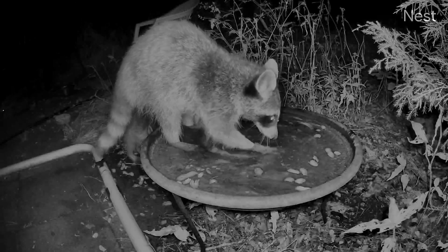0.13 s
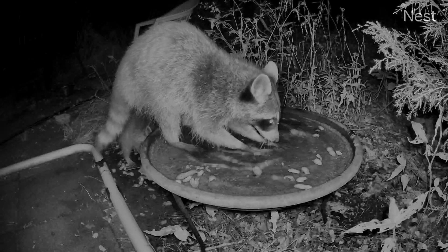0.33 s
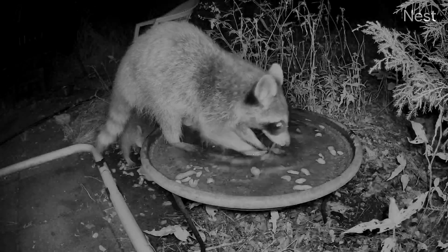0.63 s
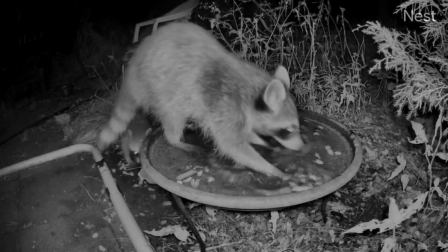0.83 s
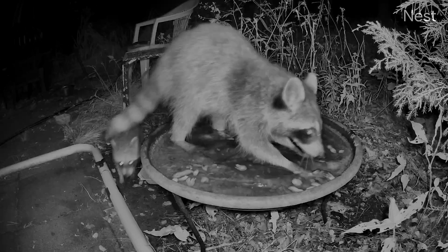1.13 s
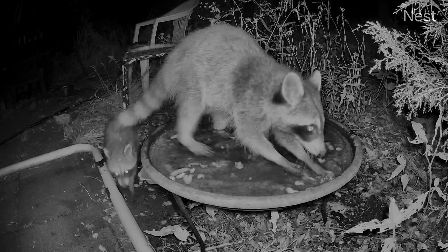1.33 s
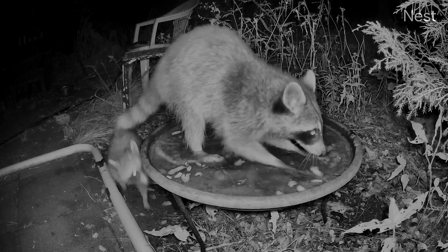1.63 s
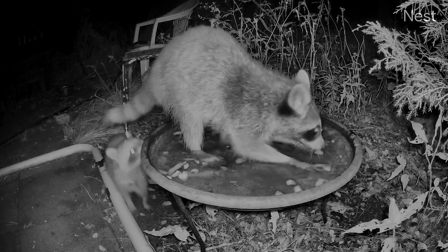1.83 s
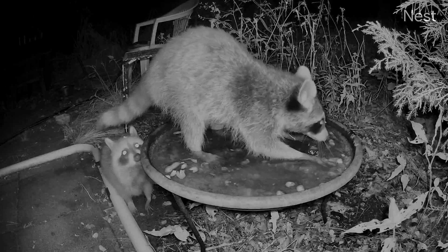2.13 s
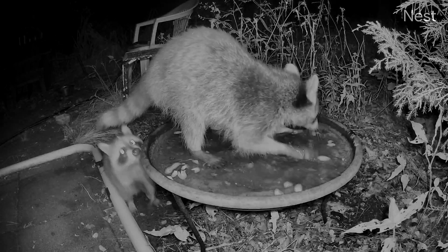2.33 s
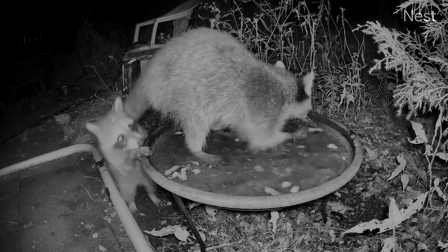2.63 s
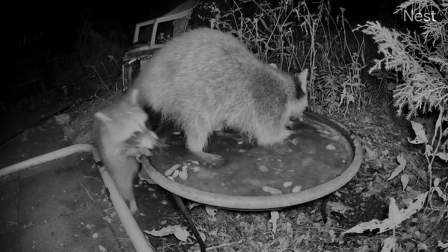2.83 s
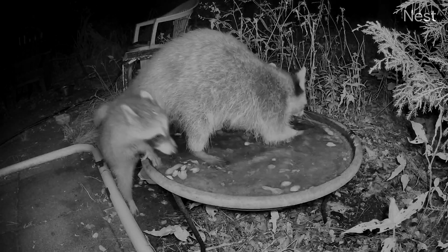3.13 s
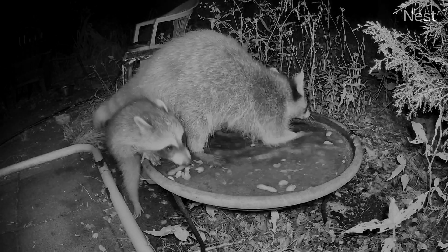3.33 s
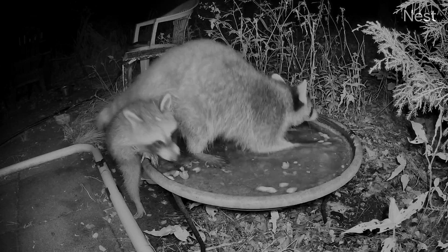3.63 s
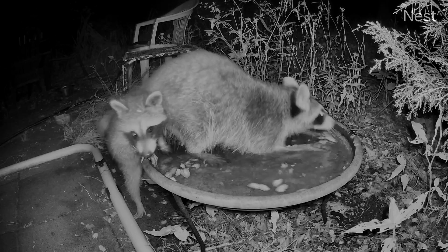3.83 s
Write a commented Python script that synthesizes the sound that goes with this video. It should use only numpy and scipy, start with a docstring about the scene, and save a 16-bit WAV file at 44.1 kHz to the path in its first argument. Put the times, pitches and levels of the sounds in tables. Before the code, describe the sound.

Raccoon chittering: fast throaty purring chirps in two bursts, with water drips and faint paw scuffs

```python
"""Night garden: crickets and katydids buzz as throbbing resonant noise over far traffic rumble, shaped noise.
A near katydid stops early; then an adult raccoon paws a shallow water dish: drips ring as bubbles, claws
tick as noise bursts and paws scuff as friction noise. A young raccoon chitters a long trill of short
voiced pulses and gliding notes; after more pawing comes a second, shorter trill.
A small outdoor camera microphone, dull above 7 kHz."""
import sys
import numpy as np
from scipy import signal
from scipy.fft import rfft, irfft
from scipy.io import wavfile
from scipy.ndimage import uniform_filter1d

SR = 44100
rng = np.random.default_rng(int(sys.argv[2]) if len(sys.argv) > 2 else 0)


def transcribe(u):
    """Save the signal u as a 16-bit wav file named by the first command-line argument.

    u: samples, shape (n,) or (channels, n), limited to [-1, 1]; the rate is SR.
    q: integer samples, one column per channel.
    """
    v = np.clip(np.atleast_2d(u).T, -1, 1)
    q = np.round(v * 32767).astype(np.int16)
    wavfile.write(sys.argv[1], SR, q)


def makeup_ratio(level_db):
    """Linear amplitude ratio for a level in decibels (20 dB per factor of ten)."""
    decades = np.asarray(level_db, float) / 20
    return 10 ** decades


N = 176400


def curve(s, v):
    """Linear interpolation: points joined in time."""
    return np.interp(np.arange(N) / SR, s, v)


def unit(x):
    """Normalization: scaled to rms 1."""
    return x / np.sqrt(np.mean(x ** 2) + 1e-20)


def bell(t, width):
    """Gaussian pulse of height 1, width being its standard deviation."""
    return np.exp(-.5 * (t / width) ** 2)


def drift(rate):
    """Lowpassed random fluctuation of spread 1; rate is the corner of each of two poles, in Hz."""
    r = np.exp(-2 * np.pi * rate / SR)
    return unit(signal.lfilter([1], [1, -2 * r, r * r], rng.standard_normal(N + SR))[SR:])


def pitch_wobble():
    """Frequency jitter: a cycle-to-cycle pitch factor around 1."""
    return 1 + .018 * drift(150)


def band_noise(order, low_hz, high_hz):
    """Bandpass-filtered white noise, rms 1."""
    band = signal.butter(order, [low_hz, high_hz], "band", fs=SR, output="sos")
    return unit(signal.sosfilt(band, rng.standard_normal(N)))


def resonate(x, hz, width):
    """Resonance: two passes through one two-pole filter, rms 1; width is that of one pass."""
    r = np.exp(-np.pi * width / SR)
    for _ in range(2):
        x = signal.lfilter([1, 0, -1], [1, -2 * r * np.cos(2 * np.pi * hz / SR), r * r], x)
    return unit(x)


def add(out, s, x):
    """Superposition: mixes x in at time s."""
    i = int(s * SR)
    out[i:i + len(x)] += x[:N - i]


# Voiced pulses of the trills: peak_s, peak_db (fundamental), rise_s, pitch_hz,
# partial_2_db, partial_3_db, partial_4_db, partial_5_db (relative to the fundamental)
TRILL_PULSES = [(1.7808, -49, 0.0068, 782, -25, -32, -16, -13.5),
                (1.989, -45.5, 0.0074, 901, -14, -20, -25, -27),
                (2.032, -39, 0.008, 1119, -2.5, -24.5, -29, -36),
                (2.0731, -32.5, 0.0076, 992, -13.5, -30.6, -28, -45),
                (2.1072, -32, 0.0061, 1032, -12.2, -33, -22, -27),
                (2.146, -32, 0.0133, 1095, -12.5, -22, -27.7, -34),
                (2.1885, -31, 0.0118, 1011, -16, -20.5, -25.5, -27),
                (2.229, -30.2, 0.0093, 1042, -15, -15, -25.9, -30),
                (2.2693, -30.5, 0.0086, 1059, -12.5, -12, -24.5, -32.4),
                (2.3138, -28.5, 0.0173, 951, -16, -29, -31.5, -44.5),
                (2.617, -28.5, 0.009, 930, -17.5, -36, -42.5, -37),
                (2.6532, -28, 0.0128, 1049, -12, -27.1, -23.5, -34.4),
                (2.687, -26.5, 0.0109, 1028, -13, -19, -23.5, -27.5),
                (3.7671, -40, 0.0054, 680, -38, -34, -22, -28),
                (3.8054, -34.5, 0.015, 785.3, -28, -31.9, -20.2, -25),
                (3.8381, -28.5, 0.0083, 937, -7.5, -32, -19.5, -25.5),
                (3.8742, -32, 0.0125, 1033, -2.5, -13.8, -9.5, -29),
                (3.9118, -30.5, 0.0082, 935, -6, -26, -11, -13.5),
                (3.9525, -31, 0.0126, 903, -7, -29, -10, -14),
                (3.9943, -34.5, 0.0091, 910, -1.5, -16.5, -8, -11)]


def trill_pulses():
    """Harmonic synthesis: a near sine swells upward in pitch; overtones and rasp flare at its close."""
    rise_steep, rise_shape, fall_s = 2.8, 2.47, .0046
    pitch_rise, pitch_drop = .09, .083  # share climbed in the rise, sagged in the fall
    flare_lag_s, flare_width_s, octave_width_s = .0017, .0023, .0026
    rasp_db, breath_db, breath_s = -10, -16, .024  # levels relative to the fourth partial
    spray_db = -34.5  # airy top, relative to the fundamental
    gulp_hz, gulp_db, gulp_spread_db, gulp_lag_s, gulp_s = 640, -25, 4, .004, .003
    out = np.zeros(N)
    hiss = band_noise(4, 1600, 5200)
    spray = band_noise(3, 5000, 9500)
    wobble = pitch_wobble()
    for s, db, rise, hz, octave_db, *upper in TRILL_PULSES:
        t = np.arange(-2 * rise, .04, 1 / SR)  # zero at the peak
        span = slice(int(s * SR) - len(t), int(s * SR))
        swell = np.exp(-rise_steep * np.abs(t / rise) ** rise_shape)
        release = np.exp(-np.abs(t / fall_s) ** 4)
        envelope = np.where(t < 0, swell, release)
        sag = -pitch_drop * np.minimum(t / fall_s, 2) ** 2
        bend = 1 + np.where(t < 0, pitch_rise * t / rise, sag)
        phase = 2 * np.pi * np.cumsum(hz * wobble[span] * bend) / SR

        octave = makeup_ratio(octave_db) * bell(t - flare_lag_s, octave_width_s) * np.sin(2 * phase)
        noise = makeup_ratio(upper[1]) * hiss[span]
        overtones = sum(makeup_ratio(d) * np.sin((k + 3) * phase) for k, d in enumerate(upper))
        top = overtones + makeup_ratio(rasp_db) * noise + makeup_ratio(spray_db) * spray[span]
        top = top * bell(t - flare_lag_s, flare_width_s)
        breath = makeup_ratio(breath_db) * noise * np.exp(-(t / breath_s) ** 2) * np.hanning(len(t))
        # uneven low pop as the throat shuts
        gulp = makeup_ratio(gulp_db + gulp_spread_db * rng.standard_normal()) * bell(t - gulp_lag_s, gulp_s)
        gulp = gulp * np.sin(2 * np.pi * gulp_hz * t)
        add(out, s + t[0], makeup_ratio(db) * (envelope * np.sin(phase) + octave + top + breath + gulp))
    return out


# Gliding notes of the trills, the last a very short one leading into a pulse; each a list of points:
# time_s, pitch_hz, partial_1_db, partial_2_db, partial_3_db (rms)
GLIDING_NOTES = [
    [(2.343, 843, -67, -95, -90), (2.350, 843, -35, -81.5, -87), (2.356, 857, -36, -57.5, -72),
     (2.366, 873, -32.5, -57.5, -77), (2.372, 956, -27, -52.5, -73), (2.375, 1004, -34, -45.5, -62),
     (2.379, 976, -65.5, -55.5, -75), (2.383, 865, -41, -80, -78)],
    [(2.404, 850, -53.5, -90, -85), (2.410, 830, -35.5, -69, -90), (2.415, 714, -42.5, -78, -77.5),
     (2.419, 730, -40.5, -80, -84), (2.426, 698, -48.5, -83, -97), (2.445, 710, -93, -91.5, -98)],
    [(2.722, 854, -56, -56, -78), (2.728, 855, -34, -49.5, -56), (2.739, 825, -46, -51, -53.5),
     (2.752, 835.4, -33.5, -44.5, -57), (2.757, 731, -41.5, -58, -58.5), (2.762, 762, -32, -77, -66),
     (2.769, 705, -40.5, -85, -59), (2.776, 662, -54, -81, -66)],
    [(3.793, 865, -58, -74, -72), (3.798, 845, -40.5, -69, -63), (3.801, 790, -38.5, -59, -70),
     (3.805, 760, -58, -70, -69)],
]


def gliding_notes():
    """Additive synthesis: three gliding harmonics, with rasp noise following the second."""
    rasp_db = -21  # relative to the second partial's table level
    out = np.zeros(N)
    hiss = band_noise(4, 1600, 5200)
    wobble = pitch_wobble()
    for note in GLIDING_NOTES:
        s, hz, *levels = np.transpose(note)
        t = np.arange(s[0], s[-1], 1 / SR)
        span = slice(int(s[0] * SR), int(s[0] * SR) + len(t))
        phase = 2 * np.pi * np.cumsum(np.interp(t, s, hz) * np.sqrt(wobble[span])) / SR
        fade = signal.windows.tukey(len(t), .2)
        rasp = makeup_ratio(rasp_db + np.interp(t, s, levels[1])) * hiss[span]
        voice = 0
        for k, db in enumerate(levels):
            gain = uniform_filter1d(makeup_ratio(np.interp(t, s, db)), size=60)
            voice = voice + gain * np.sin((k + 1) * phase)
        add(out, s[0], fade * (np.sqrt(2) * voice + rasp))
    return out


# Overtone flares of the gliding notes: centre_s, tone_peak_db, pitch_hz, width_s
OVERTONE_FLARES = [(2.375, -48, 3900, .003), (2.767, -60, 3100, .006), (2.744, -68, 4170, .008),
                   (3.801, -56, 3300, .003), (3.801, -60, 4200, .003)]


def overtone_flares():
    """Gaussian wave packets: brief high tones roughened by noise."""
    out = np.zeros(N)
    hiss = band_noise(4, 1600, 5200)
    for s, db, hz, width in OVERTONE_FLARES:
        t = np.arange(-3 * width, 3 * width, 1 / SR)
        rough = makeup_ratio(-10) * hiss[int(s * SR):][:len(t)]
        add(out, s + t[0], makeup_ratio(db) * bell(t, width) * (np.sin(2 * np.pi * hz * t) + rough))
    return out


def chitter():
    """Superposition of the young raccoon's pulses, gliding notes and overtone flares."""
    return trill_pulses() + gliding_notes() + overtone_flares()


# Drips and wet ticks: start_s, level_db, pitch_hz, t60_s, crack_db (relative to level_db)
DRIP_RINGS = [(0.7009, -32, 2177, 0.051, -21), (0.869, -55, 1750, 0.027, -25.),
              (1.2194, -60.5, 2020, 0.063, -10.), (1.243, -35.5, 4110, 0.022, -28),
              (1.3823, -50.5, 3640, 0.039, -13), (1.3825, -56.5, 1880, 0.038, -1),
              (1.468, -60, 5400, 0.051, 2), (1.529, -47, 4160, 0.021, -7), (2.97, -57, 3250, 0.067, -9)]


def drips():
    """Bubble resonance: a damped sine gliding slightly upward, with a short crack at its start."""
    glide, wander = .025, .018  # pitch climbs by twice the glide over one t60; random share grows with time
    rise_s, crack_s = .0018, .0015
    out, t = np.zeros(N), np.arange(4000) / SR
    for s, db, hz, t60, crack_db in DRIP_RINGS:
        bend = 1 + (2 * glide + wander * drift(150)[:len(t)]) * t / t60
        ring = np.sin(2 * np.pi * hz * np.cumsum(bend) / SR)
        ring = ring * makeup_ratio(-60 * t / t60) * (1 - np.exp(-t / rise_s))
        crack = resonate(rng.standard_normal(len(t)), hz * 1.4, hz) * np.exp(-t / crack_s)
        add(out, s, makeup_ratio(db) * (ring + makeup_ratio(crack_db) * crack))
    return out


# Low bumps of the dish: centre_s, peak_db, pitch_hz, width_s
DISH_BUMPS = [(1.466, -50.5, 62, 0.029), (2.618, -55.5, 60.8, 0.0192), (3.422, -56.5, 63, 0.018)]


def dish_bumps():
    """Low-frequency wave packets: cosines under a Gaussian envelope, tapered at both ends."""
    out, t = np.zeros(N), np.arange(4000) / SR
    t = t - t[2000]
    for s, db, hz, width in DISH_BUMPS:
        envelope = bell(t, width) * np.hanning(len(t))
        add(out, s + t[0], makeup_ratio(db) * envelope * np.cos(2 * np.pi * hz * t))
    return out


# Dry claw ticks: start_s, level_db, colour_hz
CLAW_TICKS = [(.62, -67, 4800), (.69, -59, 4660), (.78, -62, 4700), (1.205, -64, 4700), (1.2435, -51, 4570),
              (1.385, -64, 6130), (1.43, -58, 8100), (1.4705, -59, 6840), (1.531, -61, 7500),
              (1.70, -67, 7000), (1.82, -59, 4770), (2.975, -56, 4600), (3.545, -62, 5400)]


def claws():
    """Impact noise: very short decaying bursts, each through a broad resonance."""
    decay_s, q = .0026, 2.5
    out, t = np.zeros(N), np.arange(800) / SR
    for s, db, hz in CLAW_TICKS:
        burst = resonate(rng.standard_normal(len(t)), hz, hz / q)
        add(out, s, makeup_ratio(db) * np.exp(-t / decay_s) * burst)
    return out


# Level of the paws scuffing the dish: time_s, level_db
SCUFF_LEVEL = [(0, -86), (.26, -77.5), (.5, -92), (.62, -83), (.8, -72.5), (.95, -86), (1.2, -98),
               (1.52, -79.5), (1.58, -70), (1.75, -70.5), (1.86, -81), (2.3, -82.5), (2.4, -104),
               (2.86, -87), (2.92, -72.5), (3.15, -68.5), (3.26, -77.5), (3.5, -105.5), (4, -82)]
# Resonances of the scuffed dish: centre_hz, width_hz, relative_level_db
DISH_RESONANCES = [(2130, 200, -5.5), (3250, 120, 0), (4050, 890, -10.5), (4600, 660, 4.7), (4810, 670, -7)]


def scuffs():
    """Friction excitation: lumpy noise drives the dish's resonances."""
    grit = rng.standard_normal(N) * makeup_ratio(3.5 * drift(25))  # lumps in dB
    body = sum(makeup_ratio(db) * resonate(grit, hz, width) for hz, width, db in DISH_RESONANCES)
    return makeup_ratio(curve(*np.transpose(SCUFF_LEVEL))) * unit(body)


def throb(rate, depth):
    """Amplitude modulation by a cosine whose phase wanders."""
    t = np.arange(N) / SR
    return 1 + np.clip(depth, 0, 1) * np.cos(2 * np.pi * rate * t + .3 * drift(1.1))


# Insect chorus: centre_hz, width_hz, pulse_rate_hz, pulse_depth (0-1), level_db (before swell and throb)
INSECT_CHORUS = [(2817, 350, 42, .15, -75), (5983, 434, 62, 0.7, -75), (6315, 900, 120, 0.2, -73)]
# Resonances of the near katydid: centre_hz, width_hz, level_db (rms before throb)
KATYDID_WINGS = [(5940, 350, -65.5), (6420, 210, -68.5), (9600, 600, -77)]


def insects():
    """Modulated resonance: noisy wing bands throb at their stroke rates; one near katydid stops early."""
    out = np.zeros(N)
    for hz, width, rate, depth, db in INSECT_CHORUS:
        swell = makeup_ratio(db + 1.0 * drift(9))  # 1 dB spread
        out += swell * throb(rate, depth) * resonate(rng.standard_normal(N), hz, width)
    near = sum(makeup_ratio(db) * resonate(rng.standard_normal(N), hz, width) for hz, width, db in KATYDID_WINGS)
    stop_s, fade_s = .425, .0039
    gate = np.clip((stop_s - np.arange(N) / SR) / fade_s, 0, 1)
    return out + near * throb(93.3, .52) * gate


# Spectrum of the night air: frequency_hz, relative_density_db
NIGHT_SPECTRUM = [(20, -27.5), (40, -7), (65, -4), (130, -2.5), (200, -7.5), (300, -13.5), (600, -19.5),
                  (1000, -24), (1700, -29.5), (2400, -29), (4000, -29), (5000, -41.5), (7000, -25),
                  (7600, -48.5), (8200, -46.5), (9200, -40), (9900, -48.5), (10400, -66.5), (15500, -61),
                  (16000, -71), (22000, -72)]


def night():
    """Spectral shaping of white noise: far rumble and microphone hiss."""
    level_db = -65  # rms
    hz = np.arange(N // 2 + 1) * SR / N + 1  # the offset avoids log(0)
    f, db = np.transpose(NIGHT_SPECTRUM)
    gain = makeup_ratio(np.interp(np.log(hz), np.log(f), db))
    return makeup_ratio(level_db) * unit(irfft(rfft(rng.standard_normal(N)) * gain, N))


def yard(x, db):
    """Diffuse reflection: convolution with a decaying noise tail, echoes off wall and ground."""
    t60_s, gap_s = .16, .004
    t = np.arange(SR // 4) / SR
    onset = np.clip(t / gap_s - 1, 0, 1)
    tail = unit(rng.standard_normal(len(t)) * makeup_ratio(-60 * t / t60_s) * onset)
    tail = tail / np.sqrt(len(t))  # unit energy
    return x + makeup_ratio(db) * signal.fftconvolve(x, tail)[:N]


def scene():
    """Superposition of all sources, mono; the microphone port lowpasses near sounds above its top."""
    port_hz, air_db, air_limit_hz = 7560, -15, 9700
    near = yard(chitter(), -16.5) + yard(drips() + dish_bumps() + claws(), -19) + scuffs() + insects()
    dull = signal.sosfiltfilt(signal.butter(6, port_hz, fs=SR, output="sos"), near)
    air = signal.sosfilt(signal.butter(8, air_limit_hz, fs=SR, output="sos"), near - dull)
    return (dull + makeup_ratio(air_db) * air + night())[None]


def top_cut(x):
    """Nothing passes above the cut-off."""
    return signal.sosfilt(signal.butter(12, 10100, fs=SR, output="sos"), x)


def record(dry):
    """Signal chain: the finished mix passes through the last stage."""
    return top_cut(dry)


dry = scene()
out = record(dry)
transcribe(out)
```